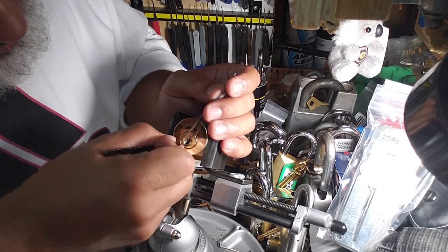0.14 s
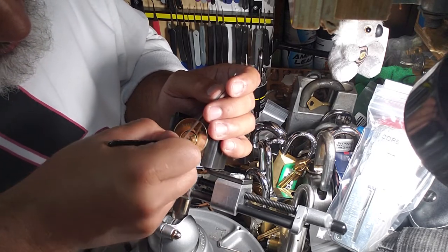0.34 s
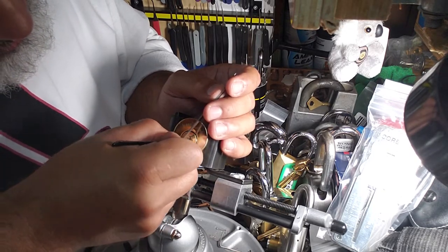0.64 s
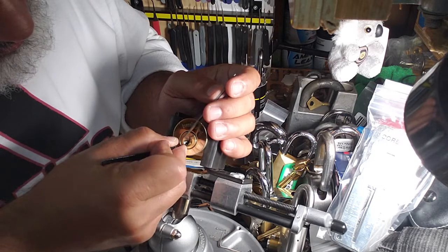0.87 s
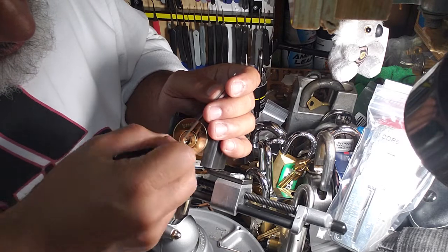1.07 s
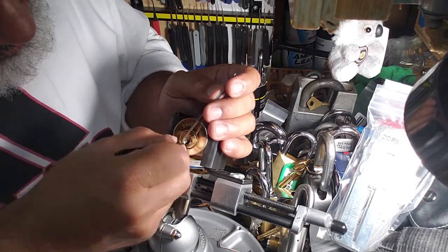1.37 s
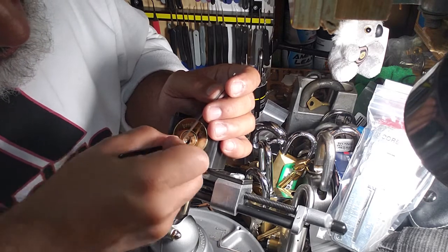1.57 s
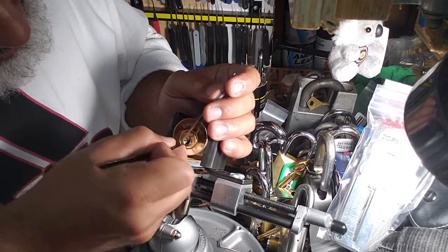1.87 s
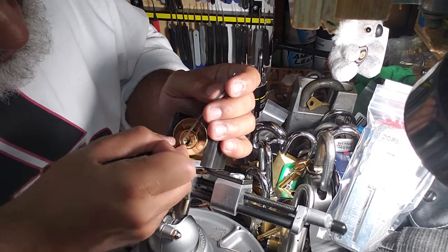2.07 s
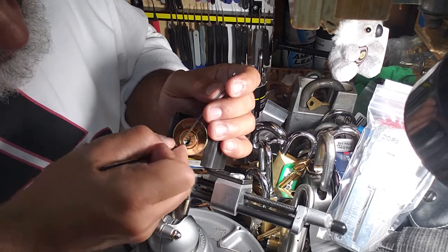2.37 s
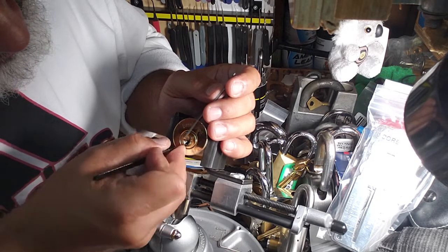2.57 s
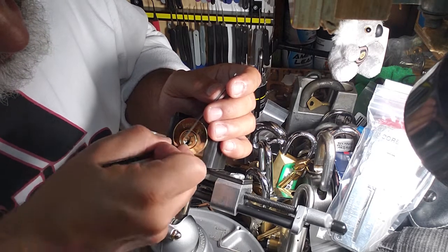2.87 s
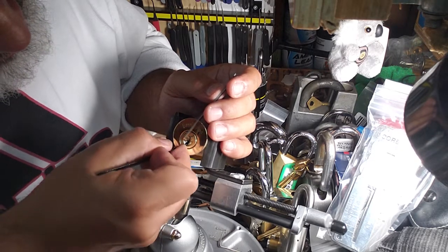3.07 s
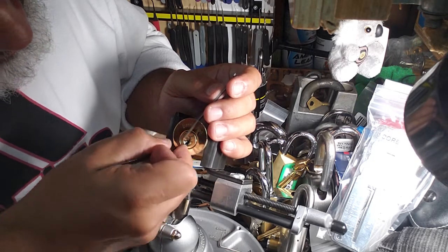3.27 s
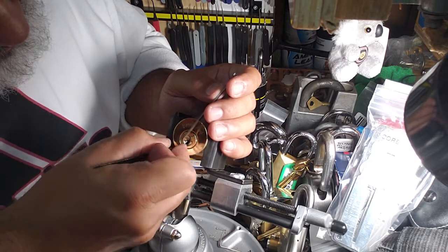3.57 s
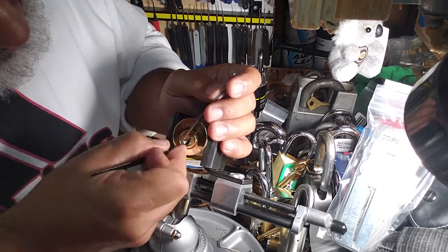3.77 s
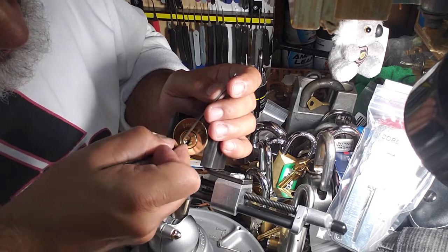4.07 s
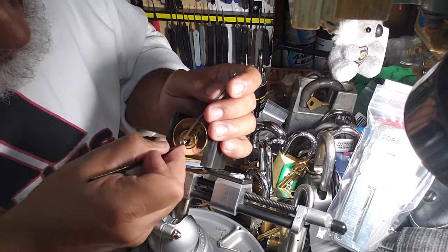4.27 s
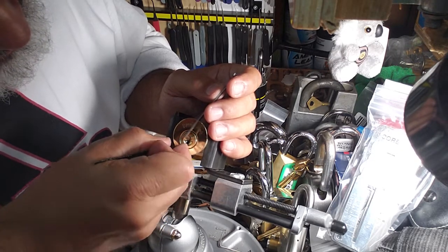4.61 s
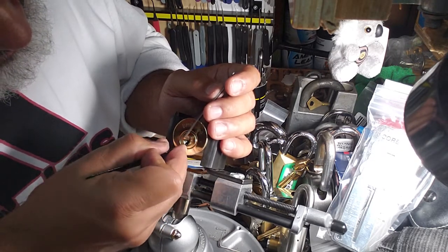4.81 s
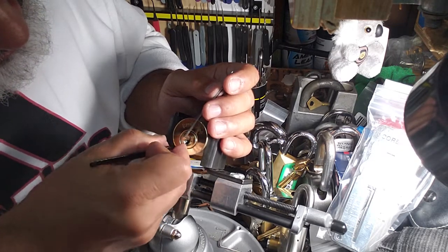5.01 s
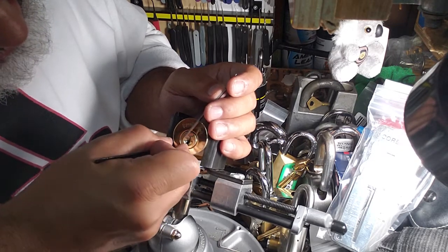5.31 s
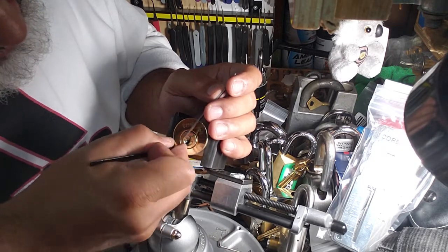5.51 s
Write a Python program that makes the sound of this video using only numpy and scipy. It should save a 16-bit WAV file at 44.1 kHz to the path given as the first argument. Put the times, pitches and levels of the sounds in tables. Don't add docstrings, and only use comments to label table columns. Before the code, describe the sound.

Close to the microphone, a steel pick drags in a brass lock with tiny dry ticks. A strong metallic snap comes at about half a second, one with a hollow knock just after two seconds, and the loudest past four. Behind, a pump hums low and steadily with faint buzz and high hiss, while water trickles in small ringing bubbles. Small indoor room, wide stereo, everything quiet.

```python
import sys
import numpy as np
from scipy import signal
from scipy.io import wavfile
from scipy.ndimage import uniform_filter1d

SR = 44100
rng = np.random.default_rng(int(sys.argv[2]) if len(sys.argv) > 2 else 0)


def voltage_ratio(level):
    return 10 ** (np.asarray(level, float) / 20)


def to_wav(sig):
    pcm = np.clip(np.atleast_2d(sig), -1, 1) * 32767
    pcm = np.round(pcm).astype(np.int16)
    wavfile.write(sys.argv[1], SR, pcm.T)


N = 249165

MAINS_HZ, ROTOR_HZ, BEAT_S = 59.974, 59.23, .8
EDGE_HZ = 15720


def evened(x):
    return x / np.sqrt(np.mean(x ** 2) + 1e-20)


def add(mix, start_s, sound):
    part = mix[:, round(start_s * SR):][:, :sound.shape[1]]
    part += sound[:, :part.shape[1]]


def play(make, table):
    mix = np.zeros((2, N))
    for row in table:
        add(mix, *make(*row))
    return mix


def resonate(x, hz, width_hz):
    turn = np.exp(2j * np.pi * np.cumsum(hz * np.ones(x.shape[-1])) / SR)
    r = np.exp(-np.pi * width_hz / SR)
    return 2 * (turn * signal.lfilter([1 - r], [1, -r], x / turn)).real


def resonate_twice(x, hz, width_hz):
    return resonate(resonate(x, hz, width_hz), hz, width_hz)


def band(x, lo_hz, hi_hz):
    return signal.sosfiltfilt(signal.butter(2, [lo_hz, hi_hz], "bandpass", fs=SR, output="sos"), x)


def sides(pan_db):
    return voltage_ratio(np.array([[pan_db / 2], [-pan_db / 2]]))


# pitch_hz, likeness (0 to 1)
LIKENESS = [(60, .98), (250, .93), (500, .75), (1200, .45), (2700, .1), (6000, .02)]


def noise(table, lo_hz, hi_hz, patchy_db, flicker_db):
    frames, hz = N // 256 + 5, np.fft.rfftfreq(1024, 1 / SR)
    a, b, c, d, raw = rng.standard_normal((frames, 513, 5)).T
    flicker = evened(uniform_filter1d(uniform_filter1d(raw, size=90, axis=0), size=4, axis=1))
    patches = evened(uniform_filter1d(uniform_filter1d(raw, size=14, axis=0), size=9, axis=1))

    log_hz = np.log(hz + 1)
    table_hz, *colour_db = np.transpose(table)
    level_db = np.array([np.interp(log_hz, np.log(table_hz), ear_db) for ear_db in colour_db])[:, :, None]
    same_hz, same = np.transpose(LIKENESS)
    same = np.clip(np.interp(log_hz, np.log(same_hz), same), 0, 1)[:, None]

    left = a + 1j * b
    right = same * left + np.sqrt(1 - same ** 2) * (c + 1j * d)
    z = np.array([left, right]) * ((hz >= lo_hz) & (hz < hi_hz))[:, None]
    z = z * voltage_ratio(level_db + patchy_db * patches + flicker_db * flicker - 29.5)
    return signal.istft(z, nperseg=1024, noverlap=768)[1][:, :N]


# pitch_hz, left_db, right_db
ROOM = [(25, -43, -43), (40.6, -38, -31.5), (83.5, -29, -38), (128.4, -24.5, -24.5), (185, -36.5, -49.5),
        (270, -46, -39), (330, -49.5, -41), (408, -42.5, -47), (622, -65, -45.5), (866, -57.5, -59.5),
        (1100, -59.5, -59), (1570, -53.5, -53.5), (1960, -55.5, -54.5), (2300, -54.5, -53.5),
        (2600, -55, -60)]


def room():
    return noise(ROOM, 20, 2410, patchy_db=1.1, flicker_db=.6)


def multiples(table, turns):
    t = np.arange(N) / SR - BEAT_S
    return sum(voltage_ratio(np.array(ears_db))[:, None] * np.cos(2 * np.pi * (order * MAINS_HZ * t + start))
               for (order, *ears_db), start in zip(table, turns))


# mains_multiple, left_db, right_db
FAINT_TONES = [(7, -77, -75), (32, -96, -86), (39, -81, -105), (54, -87, -102), (121, -88, -120),
               (131, -88, -125), (9, -84, -77), (17, -86, -92), (19, -83, -110), (20, -84, -81), (40, -80, -89),
               (43, -100, -88), (45, -96, -90), (47, -87, -93), (49, -86, -96),
               (55, -90, -91), (56, -89, -93), (57, -90, -109), (61, -91, -90), (62, -97, -91), (63, -91, -96),
         (64, -89, -89), (65, -93, -94), (66, -91, -93), (67, -90, -95), (77, -99, -100), (79, -96, -95),
         (86, -94, -101), (88, -87, -110), (90, -84, -104), (91, -91, -110), (92, -91, -110),
         (94, -94, -101), (102, -87, -110), (118, -87, -110), (119, -85, -110), (120, -87, -106),
         (124, -83, -105), (132, -82, -110), (133, -85, -110), (135, -97, -97), (136, -90, -97),
         (142, -91, -93), (149, -87, -94), (153, -85, -86), (166, -83, -100), (183, -80, -82),
         (191, -83, -84), (197, -85, -86)]


def whine():
    table = FAINT_TONES
    return np.sqrt(2) * multiples(table, rng.random((len(table), 2, 1)))


# mains_multiple, left_db, right_db
HUM = [(1, -41, -42), (2, -55, -56), (3, -59, -58), (4, -66, -77), (5, -77, -72), (6, -83, -73),
       (10, -78, -70), (11, -90, -78), (12, -89, -81)]
# mains_multiple, left_db, right_db
BUZZ = [(21, -74, -74.5), (22, -90, -79), (23, -81, -82), (24, -77, -83), (25, -86, -82), (26, -76, -77),
        (27, -71, -84), (28, -88, -72), (29, -78, -76), (30, -80, -81), (31, -91, -83), (33, -84, -81),
        (34, -93, -77), (35, -82, -86), (36, -89, -83), (38, -83, -84), (46, -83, -90), (50, -81, -99),
        (51, -78, -94), (52, -70, -95), (53, -70, -92), (122, -80, -108), (126, -83, -113),
        (127, -80, -119), (129, -81, -113), (130, -78, -121)]
# pitch_hz, left_db, right_db
HISS = [(2600, -67, -65), (3110, -51.5, -66), (3500, -60.5, -65), (4340, -66, -61.5), (4920, -63, -65),
        (5700, -59.5, -75), (6400, -55.5, -78), (7800, -50, -90), (8180, -57, -77), (8380, -60, -58),
        (9070, -51, -46.5), (10090, -45, -43), (10550, -49, -53), (11000, -44.5, -45), (12500, -49.5, -49),
        (14000, -45.5, -55.5), (15300, -47.5, -52)]
HUM_TURNS = [.54, .58, .09, .51]


def pump():
    t = np.arange(N) / SR - BEAT_S
    right_lag = np.array([[0], [.06]])
    table = HUM + BUZZ
    turns = .89 + .1 * (rng.random((len(table), 2, 1)) - .5)
    turns[:, 1, 0] += np.clip(.24 * (np.transpose(table)[0] - 26), 0, 1.5)
    turns[:len(HUM), 1] = turns[:len(HUM), 0]
    turns[:len(HUM_TURNS)] = [start - right_lag / (k + 1) ** 2 for k, start in enumerate(HUM_TURNS)]

    tones = multiples(table, turns)
    tones += voltage_ratio(-55.5) * np.cos(2 * np.pi * (ROTOR_HZ * t + HUM_TURNS[0] - right_lag))
    tones += voltage_ratio(-68) * np.cos(2 * np.pi * 174.37 * t)

    hiss = noise(HISS, 2410, EDGE_HZ, patchy_db=1.3, flicker_db=1.3)
    valve = band(hiss, 8600, 9970)
    throb = np.cos(2 * np.pi * (MAINS_HZ * t - np.array([[.26], [.36]])))
    return np.sqrt(2) * tones + hiss + np.array([[.3], [.4]]) * throb * valve


# pitch_hz, width_hz, level_db, left_minus_right_db
WHISTLES = [(10180, 280, -61, -9), (11050, 200, -68, 5)]


def whistles():
    t = np.arange(N) / SR - BEAT_S
    puff = 0.0083 + np.maximum(np.cos(2 * np.pi * (MAINS_HZ * t - .34)), 0)
    return puff * sum(voltage_ratio(db) * sides(pan_db) * evened(resonate_twice(rng.standard_normal(N), hz, width_hz))
                      for hz, width_hz, db, pan_db in WHISTLES)


# pitch_hz, left_minus_right_db
SHADE = [(1000, 10), (1300, 7), (1550, 5), (2000, 5.5), (2400, 8), (4800, 11.5), (7000, 36.5), (9300, 5)]


def water_sides(hz):
    return sides(np.interp(hz, *np.transpose(SHADE)))


def bubble(start_s, length_s, hz, level_db, width_hz=None):
    width_hz = width_hz or min(0.15 * hz, 764)
    t = np.arange(-900, round((length_s + .05) * SR)) / SR
    a, b, c, d = rng.standard_normal((4, len(t)))
    grit = voltage_ratio(min(width_hz / 60, 5) * evened(uniform_filter1d(d, size=90)))
    drive = grit * np.array([a + 1.1 * b, a + 2.88 * c])
    drive[:, 900] += 0.6 * np.sqrt(SR / width_hz)

    glide = hz * (1 + 0.079 * (t - length_s / 2))
    glide = glide + 0.21 * width_hz * np.clip(t / length_s - .5, -.5, .7)
    ring = evened(resonate(resonate(drive, glide, 1.4 * width_hz), glide, 1.46 * width_hz))
    fade_db = -t / length_s - 260 * np.maximum(t - 0.68 * length_s, 0)
    shape = np.clip(t / 0.0018, 0, 1) * voltage_ratio(fade_db)
    return start_s, voltage_ratio(level_db + 2.5) * water_sides(hz) * (ring * shape)[:, t >= 0]


# start_s, pitch_hz, peak_db, fade_60db_s
POPS = [(.172, 2040, -56, 0.074), (.319, 1570, -49.5, 0.089), (0.5052, 1262, -40, 0.14),
        (0.548, 1283, -45, 0.061), (.785, 1350, -60, 0.12), (.838, 1377, -49.5, 0.11),
        (.878, 1325, -65, 0.13), (.93, 1570, -46.5, .12), (0.957, 1570, -44, 0.055),
        (1.008, 2086, -52, 0.11), (1.04, 2150, -55, 0.1), (1.395, 1574, -61, 0.38),
        (1.464, 2285, -50, 0.04), (1.473, 2320, -42.5, 0.044), (1.508, 1700, -56, .05),
        (1.515, 1250, -51.5, 0.16), (1.565, 1260, -47, 0.087), (1.666, 1328, -53.5, 0.2),
        (2.488, 1140, -58, .07), (2.504, 1230, -50, 0.089), (2.514, 1283, -50, 0.087),
        (2.532, 1410, -58, .07), (2.571, 1850, -46, 0.052), (2.576, 2080, -55, 0.072),
        (2.61, 2000, -59, 0.055), (3.607, 2160, -58.5, 0.17), (3.655, 2044, -56, .12),
        (3.678, 1550, -59, 0.1), (3.76, 2340, -54, 0.092), (3.804, 1534, -47.5, 0.088),
        (4.222, 1223, -57, 0.64), (4.221, 1100, -58.5, 0.36), (2.7335, 9600, -40, 0.032),
        (4.056, 2440, -58, .1), (4.935, 2250, -61, .08), (4.965, 2100, -56, .08), (5.01, 2350, -57, 0.1),
        (4.77, 2080, -60, .1), (4.576, 1295, -55, 0.11), (4.66, 1270, -54, .1), (5.52, 1395, -58, .1),
        (.998, 7350, -57, .03), (1.009, 7400, -62, .03), (1.051, 8000, -53, .03),
        (2.8325, 10600, -50, 0.016), (5.36, 2470, -58, .08), (5.462, 1386, -58, .12),
        (4.615, 1274, -57, .09)]


def pop(start_s, hz, peak_db, fade_s):
    t = np.arange(round(.12 * SR)) / SR
    rising = np.sin(2 * np.pi * hz * (t + t ** 2 / 2))
    tone = rising * (1 - np.exp(-t / 0.0024)) * voltage_ratio(-60 * t / fade_s)
    return start_s, voltage_ratio(peak_db) * water_sides(hz) * tone


# start_s, length_s, pitch_hz, level_db, width_hz
GLUGS = [(0.319, 0.035, 1590, -60, 500), (0.508, 0.02, 1287, -54, 60), (0.837, 0.077, 1353, -61, 133),
         (0.928, 0.061, 1570, -60.5, 99), (1.463, .025, 2280, -59.5, 174), (1.505, 0.026, 1680, -67, 127),
         (1.512, 0.1, 1244, -63, 64), (1.616, 0.046, 1070, -66, 220), (1.665, 0.034, 1370, -59.5, 161),
         (1.891, 0.058, 1600, -61.5, 208), (2.215, 0.037, 970, -69, 200), (2.496, 0.035, 1260, -57.5, 125),
         (2.569, 0.036, 2020, -54.5, 497), (3.066, 0.029, 1720, -62, 298), (3.233, 0.022, 1235, -63.5, 47),
         (3.674, 0.038, 1570, -62.5, 140), (3.801, 0.031, 1500, -64.5, 129), (4.219, 0.034, 1124, -62, 120),
         (4.265, 0.041, 1510, -58.5, 600), (4.459, 0.04, 1470, -65, 167), (4.57, 0.099, 1296, -69, 138),
         (4.651, .033, 1242, -71, 63), (5.459, 0.03, 1393, -70, 95), (5.516, 0.027, 1450, -70, 126)]
# start_s, length_s, pitch_hz, level_db
CLUSTERS = [(0.079, 0.14, 3060, -69.5), (0.143, 0.067, 1960, -66), (0.228, 0.022, 2140, -68),
            (0.457, 0.051, 2120, -63.5), (0.546, 0.048, 2770, -65), (0.67, 0.067, 2790, -70.5),
            (0.88, 0.041, 2970, -70.5), (1.006, 0.08, 2150, -62), (1.041, 0.049, 3180, -73),
            (1.376, 0.042, 2300, -65.5), (1.66, 0.04, 1940, -65.5), (1.88, 0.038, 2300, -65.5),
            (2.183, 0.086, 2680, -68.5), (2.475, 0.043, 2020, -68), (2.835, 0.058, 3270, -70),
            (2.85, 0.028, 2350, -64.5), (2.925, 0.066, 2180, -67.5), (3.082, 0.055, 2600, -66),
            (3.361, .044, 1980, -68.5), (3.513, 0.055, 2100, -69.5), (3.654, 0.029, 2120, -66),
            (3.749, 0.025, 2250, -67), (4.04, 0.044, 2380, -78), (4.436, 0.027, 2130, -68),
            (4.925, 0.068, 2130, -66), (4.984, 0.05, 2380, -68), (4.31, 0.035, 2290, -59),
            (2.339, 0.027, 2330, -71), (5.13, 0.061, 2670, -68), (5.352, .035, 2490, -70),
            (.002, 0.025, 6700, -72.5), (0.188, 0.063, 4860, -71.5), (0.421, 0.092, 4740, -65.5),
         (0.686, 0.062, 3670, -64), (.975, 0.05, 8200, -68), (1.049, 0.051, 8260, -67),
         (1.215, 0.025, 4370, -65), (1.259, 0.015, 3800, -65), (1.527, 0.033, 4630, -68.5),
         (1.665, 0.094, 3820, -69.5), (1.787, 0.038, 4500, -70), (1.903, 0.07, 4160, -70.5),
         (1.983, 0.021, 7100, -75), (2.134, 0.044, 3800, -70), (2.195, 0.074, 3800, -73),
         (2.53, .079, 3470, -68), (2.637, 0.027, 7350, -72), (2.67, 0.027, 8250, -69),
         (2.734, 0.013, 9580, -54), (2.829, 0.015, 10740, -51), (3.088, 0.065, 3500, -70),
         (3.477, 0.032, 6760, -73.5), (3.903, 0.054, 3730, -70), (4.196, 0.032, 6950, -75),
         (4.371, 0.081, 3700, -72.5), (4.538, 0.04, 3360, -70), (4.718, .023, 5650, -73.5),
         (5.254, 0.045, 3570, -67.5), (5.27, 0.031, 5100, -68.5), (5.544, .028, 7300, -77),
         (0.513, .03, 4480, -67), (.77, 0.029, 4700, -77), (1.01, .04, 4770, -75), (1.06, 0.055, 5000, -73),
         (1.175, 0.029, 4680, -74), (1.448, .045, 3820, -71), (2.044, .07, 3650, -73.5),
         (2.152, 0.028, 6160, -72), (3.15, .03, 3760, -70.5), (3.328, 0.036, 4430, -72.5),
         (3.84, 0.043, 5600, -74.5), (4.665, .03, 3800, -70.5)]


def trickle():
    out = play(bubble, GLUGS + CLUSTERS) + play(pop, POPS)
    for when, pitch, size in rng.random((100, 3)):
        hz = 2400 * 2.4 ** pitch
        add(out, *bubble(when * N / SR, 0.04, hz, -82 + 7 * size - 3 * pitch, 0.04 * hz))
    return out


# start_s, peak_db, pitch_hz, length_s
CREAKS = [
    (3.71, -55, 385, 0.064),
    (3.71, -39.5, 152.4, 0.037),
    (3.741, -38.5, 139, 0.031),
    (3.78, -44, 137, 0.027),
]


def creak(start_s, peak_db, hz, length_s):
    t = np.arange(round(length_s * SR)) / SR
    return start_s, voltage_ratio(peak_db) * sides(0) * np.sin(2 * np.pi * hz * t) * np.sin(np.pi * t / length_s)


# start_s, peak_db, pitch_hz, fade_60db_s
KNOCKS = [(0.523, -42, 444, 0.12), (.524, -51, 665, 0.09), (.65, -50.5, 434, 0.15),
          (1.096, -50.5, 442, 0.13), (1.207, -44, 454.4, 0.23), (1.233, -40, 442, 0.055),
          (1.385, -47, 442, 0.14), (1.63, -49.5, 448, 0.13), (1.772, -50.5, 432, 0.14),
          (1.896, -51.5, 438, 0.17), (2.176, -28, 437, 0.087), (2.214, -43, 468, 0.11),
          (2.222, -49, 660, 0.092), (2.403, -48, 435, 0.22), (2.849, -43, 446, 0.14),
          (2.873, -38, 454, 0.23), (2.898, -37, 451, 0.12), (3.607, -38.5, 450, 0.089),
          (3.941, -45, 440, 0.15), (4.309, -32, 444, 0.08), (4.308, -39, 670, .05)]


def knock(start_s, peak_db, hz, fade_s):
    t = np.arange(round(.2 * SR)) / SR
    long = 0.46 * voltage_ratio(-60 * t / fade_s) * np.sin(2 * np.pi * hz * t)
    short = 0.71 * voltage_ratio(-60 * t / 0.028) * np.sin(2 * np.pi * 1.094 * hz * t)
    return start_s, voltage_ratio(peak_db + 3.5) * sides(0.94) * (long + short) * (1 - np.exp(-t / 0.0036))


# pitch_hz, width_hz, level_db
PICK = [(9900, 1200, -13), (11000, 900, -11), (12600, 1100, -1.5), (13600, 700, -1.5), (14500, 700, 0),
        (15300, 600, 0)]
# pitch_hz, width_hz, level_db
PLUG = [(800, 800, -9), (1900, 1100, -2), (3300, 1300, -9), (5070, 1200, -9), (6290, 1000, 0),
        (7600, 1400, -6)]


def metal(drive, peak_db, pan_db, dull_db, length_s):
    bright = sum(voltage_ratio(db) * resonate_twice(drive, hz, width_hz) for hz, width_hz, db in PICK)
    dull = sum(voltage_ratio(db) * resonate_twice(drive, hz, width_hz) for hz, width_hz, db in PLUG)
    scale = np.sqrt(np.mean(bright[0, :round(length_s * SR)] ** 2))
    sound = voltage_ratio(peak_db) * sides(pan_db) * (bright + voltage_ratio(dull_db) * dull) / scale
    shaded = band(sound, 4600, 8800) + .6 * band(sound, 12800, 17000)
    return sound - np.array([[0], [1]]) * shaded


def rough_jolts():
    left, right, rough = rng.standard_normal((3, 3500))
    return np.arange(3500) / SR, np.array([left, right]) * voltage_ratio(3 * rough)


# start_s, peak_db, left_minus_right_db, dull_share_db
TICKS = [(0.337, -48, -13, -39), (0.377, -44.5, -5, -29), (0.405, -48, -2, -34), (0.4353, -45.5, -7, -22),
         (0.654, -46.5, 0, -18.5), (0.69, -44, -6, -30), (0.736, -46.5, -1, -24), (1.1445, -46, -7, -31),
         (1.209, -47, -1, -22), (1.3104, -53, 6, -32), (1.5209, -47, -3, -19), (1.647, -45, -8, -36),
         (2.5342, -52, 0, -13.5), (2.6556, -51, 1, -19), (2.831, -46.5, 1, -19), (2.892, -51, -2, -18),
         (3.003, -47.5, -11, -31), (3.267, -43, -11, -42), (3.4346, -47, -4, -26), (3.467, -44.5, -8, -31),
         (3.6755, -41.5, -8, -24), (3.689, -55, -5, -18), (4.598, -46, -5, -43), (4.653, -48, -9, -25),
         (4.821, -64, 7, -18), (5.079, -53, 8, -35), (5.2545, -42, -8, -31), (5.342, -45.5, -11, -41),
         (5.428, -50, 2, -46), (5.4595, -55, 3, -24)]


def tick(start_s, peak_db, pan_db, dull_db):
    t, jolts = rough_jolts()
    drive = jolts * voltage_ratio(-450 * t) * np.clip(t / .0015, 0, 1)
    return start_s, band(metal(drive, peak_db, pan_db + 6, dull_db + 4, .015), 1000, 13000)


# pitch_hz, level_db, fade_60db_s
RING = [(1017, -18, .04), (1717, -15, .03), (1850, -10, .035), (2080, -2, .012), (2240, -13, .05),
        (2900, -12, .03), (3560, -17, .03), (4500, -17, .012), (5100, -3, .012), (5600, -4, .012),
        (6290, 6, .01), (6800, 5, .009), (7350, -1, .02)]


def blow(start_s, peak_db, pan_db, dull_db, rattle_s):
    t = np.arange(round(.05 * SR)) / SR
    rings = []
    for hz, db, fade_s in RING:
        far_loss_db = np.array([[0], [pan_db + 18 * (hz > 4600)]])
        light_loss_db = 9 * (peak_db < -25) * (hz < 3000)
        rings.append(voltage_ratio(db - 60 * t / fade_s - far_loss_db - light_loss_db) * np.sin(2 * np.pi * hz * t))
    back = np.roll(sum(rings[:3]), round(.0048 * SR), axis=1) * (t > .0048)
    return start_s + .0003, voltage_ratio(peak_db + dull_db) * (sum(rings) + back) * np.clip(t / .0004, 0, 1)


# start_s, peak_db, left_minus_right_db, dull_share_db, rattle_s
CLICKS = [
    (.5108, -44, 6, -12, .002),
    (.5214, -27.5, 10, -13, .0012),
    (1.9588, -47, 9, -4, .002),
    (2.1731, -43, 5, -10, .003),
    (2.8468, -45, 8, -14, .002),
    (4.3075, -22, 7, -11, .0048),
]


def click(start_s, peak_db, pan_db, dull_db, rattle_s):
    t, jolts = rough_jolts()
    near = voltage_ratio(-500 * t) * (t < rattle_s)
    near = near + voltage_ratio(-7 - 800 * t) + voltage_ratio(-28 - 350 * t) + voltage_ratio(8 - 8000 * t)
    far = (t < 2 * rattle_s) + voltage_ratio(-4 - 800 * t)
    return start_s, metal(jolts * np.array([near, far]), peak_db - 3.5, pan_db, dull_db - 4, rattle_s)


def scene():
    behind = room() + whine() + pump() + whistles() + trickle()
    bench = play(creak, CREAKS) + play(knock, KNOCKS)
    lock = play(tick, TICKS) + play(blow, CLICKS) + play(click, CLICKS)
    return behind + bench + lock


def low_pass(x):
    return signal.sosfilt(signal.butter(12, 16600, fs=SR, output="sos"), x)


def record(dry):
    lowpass = signal.firwin(511, EDGE_HZ, window=("kaiser", 8), fs=SR)
    dry = signal.oaconvolve(dry, lowpass[None], "same")
    hz, _, z = signal.stft(dry, SR, nperseg=2048)
    power = (abs(z[:, :1024]) ** 2).reshape(2, 256, 4, -1).mean(2)
    faint = power < voltage_ratio(-9.0) * np.median(power, axis=2, keepdims=True)
    both = power.mean(0)
    faint |= both < .8 * np.median(both[52])
    middle = ((hz > 700) & (hz < 9200))[:1024, None]
    z[:, :1024] *= np.where(np.repeat(faint, 4, axis=1) & middle, .06, 1)
    return low_pass(signal.istft(z, nperseg=2048)[1][:, :N])


dry = scene()
out = record(dry)
to_wav(out)
```